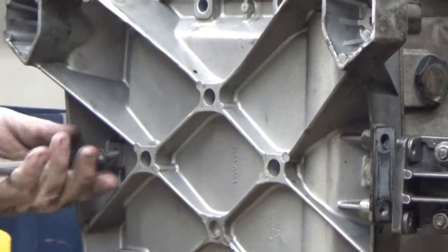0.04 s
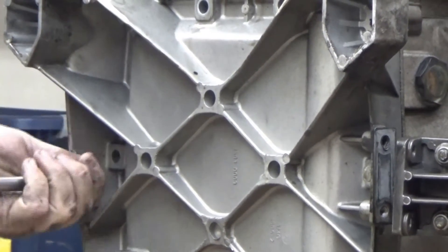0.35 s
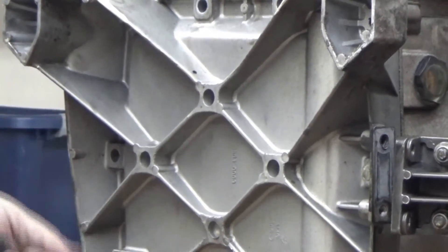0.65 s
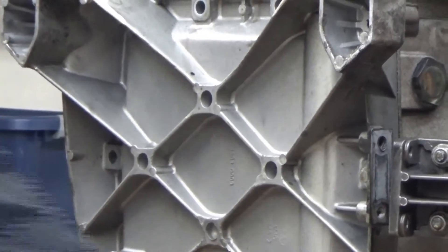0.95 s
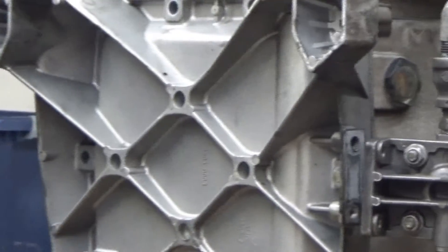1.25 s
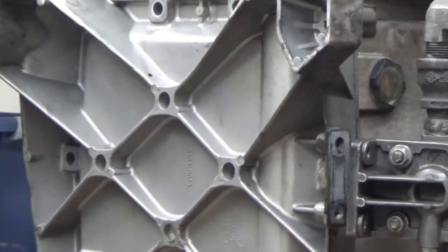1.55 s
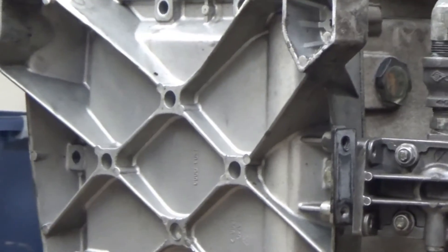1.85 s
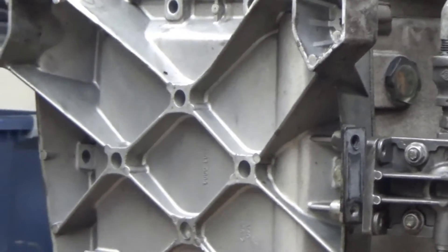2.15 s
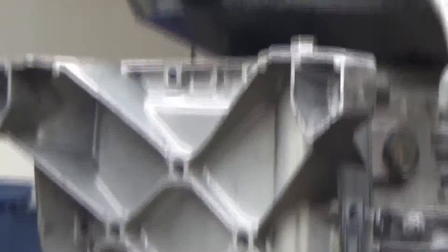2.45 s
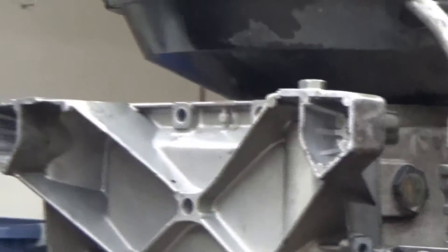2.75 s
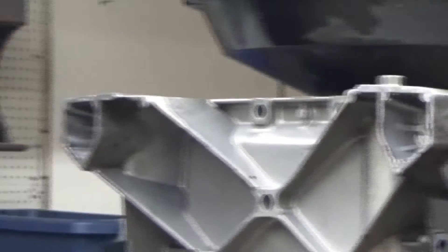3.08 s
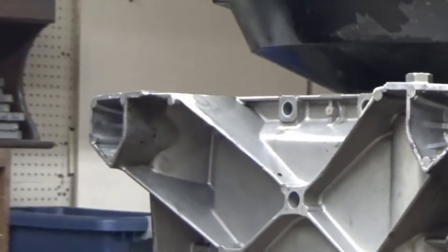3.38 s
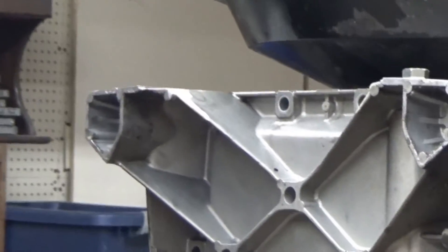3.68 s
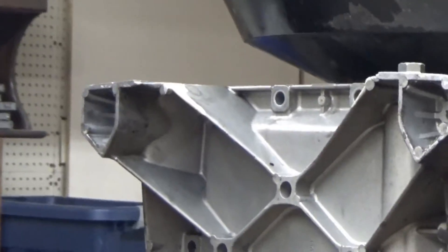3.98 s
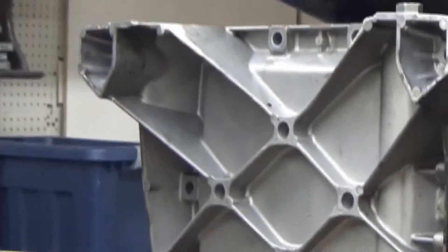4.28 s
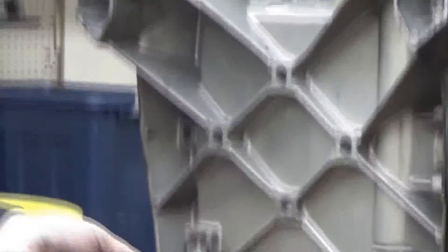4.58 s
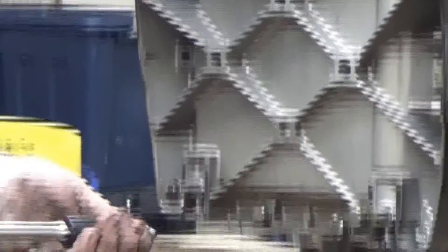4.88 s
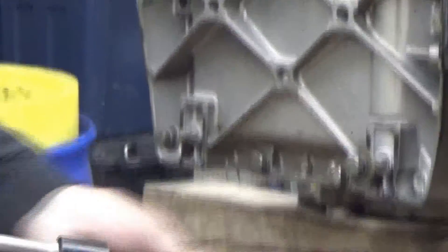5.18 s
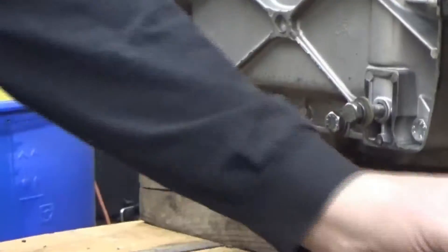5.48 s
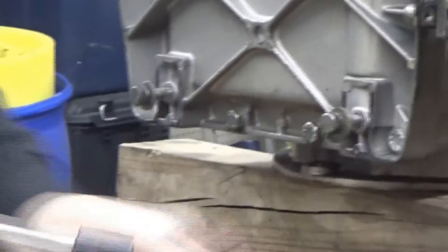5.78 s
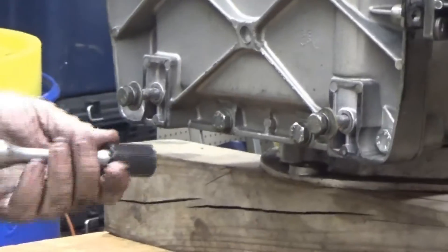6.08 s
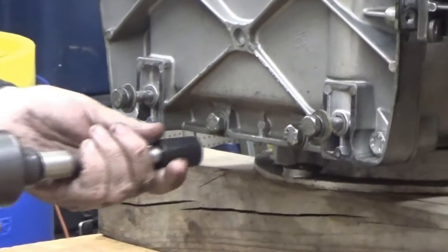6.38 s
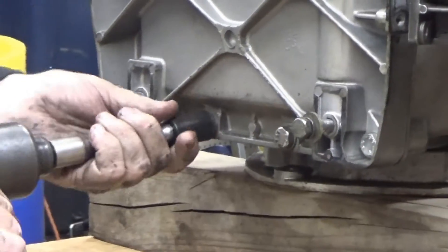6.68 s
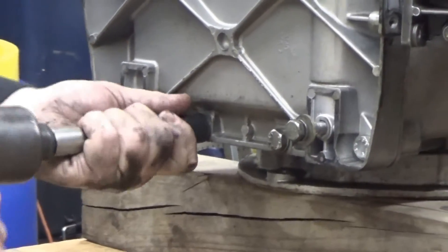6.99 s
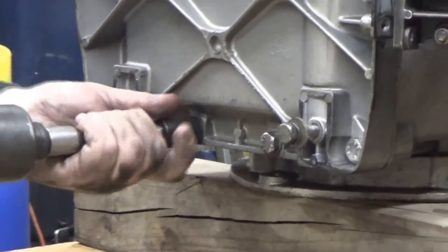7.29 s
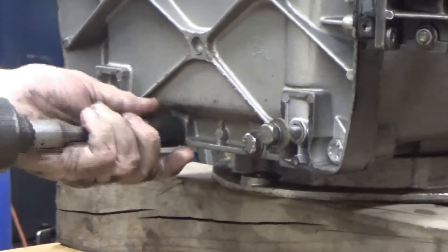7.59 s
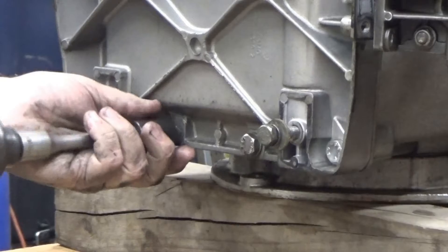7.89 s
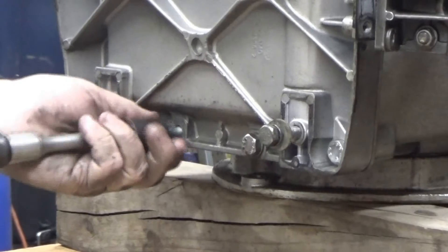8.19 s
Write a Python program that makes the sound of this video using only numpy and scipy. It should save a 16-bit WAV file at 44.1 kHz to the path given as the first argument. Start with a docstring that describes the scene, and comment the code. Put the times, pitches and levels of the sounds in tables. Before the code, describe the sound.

An air impact wrench winds down with a hiss and a clinking socket. A steel bolt drops onto a wooden bench and the tool clacks as it is handled. Two short bursts of hammering, whirring and hissing follow. Another bolt lands, the socket clanks onto a cast metal housing, and the wrench fires again. It all sounds close, in a slightly reverberant workshop with a faint hum.

```python
"""A hissing whir dies away and a loose steel socket clinks: an air impact wrench is running down.
In further short bursts it spins bolts out of a cast metal housing in a workshop. Its vane motor
chops the air into a whir and an exhaust hiss, while hammer impacts make the socket rattle.
Between bursts, bolts and tools ring and knock on a wooden bench, and the socket is pushed onto
the next bolt. The room reverberates over a faint machine hum."""
import sys
import numpy as np
from scipy import signal
from scipy.fft import rfft, irfft, next_fast_len
from scipy.io import wavfile
from scipy.ndimage import uniform_filter1d

SR = 44100
rng = np.random.default_rng(int(sys.argv[2]) if len(sys.argv) > 2 else 0)


def log_audio(samples):
    """Write samples as a 16-bit WAV file to the path given in sys.argv[1]."""
    # one column per channel
    frames = np.atleast_2d(samples).T
    # limit to full scale, then quantise
    limited = np.clip(frames, -1, 1)
    pcm = np.round(limited * 32767).astype(np.int16)
    wavfile.write(sys.argv[1], SR, pcm)


N = 363384
TIME = np.arange(N) / SR

# spectrum of steel striking steel: f/Hz, level/dB
STEEL_SPECTRUM = [(300, -23.5), (1450, -17), (1810, -1), (2300, -13), (3200, -14), (5200, -4.5),
                  (6500, -3.5), (8400, 1), (10000, -3), (12500, -7), (16000, -13.5)]
# modes of the steel socket: f/Hz, level/dB, t60/s
SOCKET_MODES = [(5420, -8.5, 0.024), (6490, -1, 0.0067), (7500, -4.5, 0.021), (7940, -1, 0.01),
                (8480, -2, 0.027), (8830, -4, 0.032), (9430, -4.5, 0.023), (10430, -5, 0.024)]
# trigger pulls: opening t/s, attack/s, exhaust level/dB, easing t/s, exhaust fade/s,
# motor level/dB, coasting t/s, motor fade/s, vane rate f/Hz above which the rotor runs smoothly
TRIGGER_PULLS = [(-.05, .01, -23.5, 0, .1, -26, 0, .2, 449.4),
                 (3.268, .011, -18.3, 3.769, .16, -24.5, 3.815, 0.16, 291),
                 (4.077, .03, -19.4, 4.39, .125, -24.5, 4.315, .08, 342),
                 (7.573, .012, -18.6, 7.941, .19, -24.3, 7.99, 0.26, 314.2),
                 (8.158, .035, -18.5, 8.24, .15, -26.5, 8.24, .2, 370)]


def amp(db):
    """Amplitude ratio of a level in decibels."""
    return 10 ** (np.asarray(db) / 20)


def unit_rms(x):
    """Normalisation to unit mean power."""
    return x / np.sqrt(np.mean(x ** 2) + 1e-20)


def value_at(points, hz):
    """Interpolation on a logarithmic frequency axis."""
    f, value = np.transpose(points)
    return np.interp(np.log(hz + 1), np.log(f + 1), value)


def coloured(x, spectrum):
    """Zero-phase filtering by a spectrum of f/Hz, level/dB."""
    size = next_fast_len(len(x))
    gain = amp(value_at(spectrum, np.fft.rfftfreq(size, 1 / SR)))
    return irfft(rfft(x, size) * gain, size)[:len(x)]


def noise(spectrum, size=N):
    """Spectrally shaped Gaussian noise of unit rms."""
    return unit_rms(coloured(rng.standard_normal(size), spectrum))


def drift(hz):
    """Random modulation: noise low-passed at hz, of unit rms."""
    coarse_time = np.linspace(0, TIME[-1], N // 32)
    lowpass = signal.butter(2, hz, fs=1 / coarse_time[1], output="sos")
    slow = signal.sosfilt(lowpass, rng.standard_normal(len(coarse_time)))
    return np.interp(TIME, coarse_time, unit_rms(slow))


def add(mix, start_s, sound):
    """Superposition of a delayed sound on the mix."""
    part = mix[max(round(start_s * SR), 0):][:len(sound)]
    part += sound[:len(part)]


def blow(spectrum, t60, rise_s=.00039):
    """Modal overlap: the crowded modes of a struck body merge into decaying noise."""
    t = TIME[:16384]
    return noise(spectrum, len(t)) * amp(-60 * t / t60) * (1 - np.exp(-t / rise_s))


def ring(modes, size=SR, rise_s=.00087):
    """Free vibration: each separate mode is a damped sinusoid."""
    t = TIME[:size]
    tones = sum(amp(db - 60 * t / t60) * np.sin(2 * np.pi * (hz * t + rng.random()))
                for hz, db, t60 in modes)
    return tones * (1 - np.exp(-t / rise_s))


def shop_noise(level_db=-66):
    """Stationary broadband noise forms the floor of the workshop."""
    # ambient spectrum: f/Hz, level/dB
    spectrum = [(12, -41.5), (20, -15), (66, -3.5), (103, -11), (497, -15), (587, -12.5), (656, -17),
                (1140, -17), (1350, -18.5), (2450, -19), (2800, -23.5), (3500, -21), (3970, -19.5),
                (4310, -22), (15000, -24.5)]
    return amp(level_db) * noise(spectrum)


def machine_hum():
    """A line spectrum: machines in the shop give steady pure tones."""
    # machine tones: f/Hz, rms level/dB
    tones = [(597.5, -82), (15735, -70)]
    return sum(amp(db) * np.sqrt(2) * np.sin(2 * np.pi * hz * TIME) for hz, db in tones)


def faint_whistle(edge_s=.2, width_hz=60):
    """Narrow-band noise is heard as a thin, wavering tone that comes and goes."""
    # the whistle: start t/s, end t/s, f/Hz, level/dB
    whistle = (1.05, 2.4, 3327, -78)
    start, end, hz, db = whistle
    swell = np.clip(np.minimum(TIME - start, end - TIME) / edge_s, 0, 1)
    phase = 2 * np.pi * hz * TIME
    return amp(db) * swell * (drift(width_hz) * np.cos(phase) + drift(width_hz) * np.sin(phase))


def wide_treble_hiss(burst_gain, level_db=-13):
    """Amplitude modulation: thin stereo noise above 8 kHz swells with each burst."""
    spectrum = [(7000, -50), (8500, -7), (10000, -2), (14000, 0), (16000, -12)]  # f/Hz, level/dB
    return amp(level_db) * burst_gain * noise(spectrum)


def room_response(gap_s=.0037, density=.1):
    """Reverberation: dense reflections decay exponentially, each band at its own rate."""
    # reverberation time of the workshop: f/Hz, t60/s
    decay_times = [(100, 0.86), (400, 0.78), (1200, 0.72), (3000, 0.84), (8000, 0.54), (15000, 0.23)]
    taps = rng.choice([-1., 1.], SR) * (rng.random(SR) < density) * (TIME[:SR] > gap_s)
    hz, t, bands = signal.stft(taps, SR, nperseg=256)
    decay = amp(-60 * t / value_at(decay_times, hz)[:, None])
    echoes = signal.istft(bands * decay, SR, nperseg=256)[1]
    return echoes / np.linalg.norm(echoes)


def room(x, moves_per_s=2.6):
    """Time-varying convolution: the reflections shift as the arm and the tool move."""
    angle = 2 * np.pi * moves_per_s * TIME
    shares = np.cos(angle), np.sin(angle)
    return sum(signal.oaconvolve(x * share, room_response())[:N] for share in shares)


def sleeve():
    """Friction noise: cloth brushes past in short, thin rustles."""
    # brushes of the sleeve: t/s, duration/s, level/dB
    brushes = [(2.773, 0.087, -49), (4.676, 0.16, -54.5), (6.997, 0.14, -62.5)]
    cloth = [(500, -4), (5000, -6), (9500, 4), (15000, -14.5)]  # f/Hz, level/dB
    out = np.zeros(N)
    for start, duration, db in brushes:
        swell = np.hanning(round(duration * SR))
        add(out, start, amp(db) * swell * noise(cloth, len(swell)))
    return out


def handling(knock_t60=.11, clack_t60=.031, thud_t60=.27, seat_t60=.061):
    """Impact excitation: bench and tool are quickly damped, while the cast housing rings on."""
    # knocks on the wooden bench: t/s, level/dB
    knocks = [(1.279, -28), (1.317, -29), (1.362, -34), (1.724, -43), (2.08, -58.5), (5.76, -30),
              (5.768, -20.5), (5.789, -29), (5.845, -34.5), (6.8989, -58)]
    # the wrench is handled or kicks: t/s, clack level/dB, thud level/dB
    clacks = [(2.2991, -41, -52.5), (2.3268, -24.5, -61), (2.348, -35, -42.5), (2.979, -37, -52),
              (2.983, -33, -54), (4.709, -38, -42.5), (6.793, -55, -57), (6.8981, -49, -57.5),
              (7.575, -21, -37), (7.636, -17.5, -41), (7.683, -17, -33)]
    # the socket is pushed home on a bolt: t/s, blow level/dB, ring level/dB
    seatings = [(7.3074, -23, -38), (7.313, -16.5, -32)]
    # impact spectra: f/Hz, level/dB
    bench = [(80, -55), (170, -45), (245, -3.5), (370, -4.5), (750, 4.5), (1300, -0.5), (2100, -6.5),
             (2900, -24.5), (6000, -23), (15000, -28)]
    tool = [(200, -18), (800, -3), (1500, 0.5), (2100, 3), (3000, -6.5), (5500, -2), (8000, -2.5),
            (12000, -13.5), (16000, -28.5)]
    casting = [(25, -54), (55, -27), (90, -9), (300, 2), (900, -6), (1300, 2), (2200, -7), (2900, -16.5),
               (5500, -22), (10000, -24), (16000, -44)]
    thud = [(25, -38.5), (90, -4), (300, 5), (500, -2.5), (1200, -8), (4000, -40.5)]
    # modes of the struck housing: f/Hz, level/dB, t60/s
    housing_modes = [(318, -14, .6), (472, -7, .33), (890, -5, 0.47), (1250, -3, .2), (1743, -1.5, .2),
                     (2207, 1, 0.16), (2394, -5.5, .2), (2930, -8.5, 0.2), (3385, -6.5, 0.17),
                     (4070, -13, 0.27), (5071, -16, 0.37), (5346, -10.5, .17), (6980, -22, .6),
                     (7540, -17, .25), (8161, -16, .2), (8745, -19, .24), (9938, -11, 0.14),
                     (12400, -21, .18)]
    out = np.zeros(N)
    for start, db in knocks:
        add(out, start, amp(db) * blow(bench, knock_t60))
    for start, clack_db, thud_db in clacks:
        add(out, start, amp(clack_db) * blow(tool, clack_t60) + amp(thud_db) * blow(thud, thud_t60))
    for start, blow_db, ring_db in seatings:
        add(out, start, amp(blow_db) * blow(casting, seat_t60, rise_s=.00096))
        add(out, start, amp(ring_db) * ring(housing_modes))
    return out


def bolts(tick_t60=.0072, ring_t60=.28):
    """Vibration of bars: loose bolts tick and ring as they are put down and bounce."""
    # landings: t/s, tick level/dB, high ring level/dB, bending level/dB
    landings = [(.415, -38, -44, -84), (1.123, -48.5, -42, -90), (1.278, -15, -21, -80),
                (1.317, -27, -28, -80), (1.363, -26.5, -33, -74), (1.8, -70, -85, -58.5),
                (5.685, -39.5, -32.5, -74), (5.768, -19, -17, -48), (5.789, -20, -26, -38),
                (5.843, -19, -23, -35.5)]
    # spectrum of the first touch: f/Hz, level/dB
    tick = [(300, -23), (1800, -9), (3200, -19), (5200, -8), (7000, -3.5), (9000, 1), (12500, -3),
            (16000, -9)]
    # short, high ring: f/Hz, level/dB
    high_modes = [(13385, -3.5), (13450, -10)]
    # long bending modes: f/Hz, level/dB, t60/s
    bending_modes = [(4410, -15, .9), (5950, -4, 0.62), (5935, -11, 0.5), (8720, -5.5, 0.42),
                     (10100, -5, 0.28), (10560, -9, .5)]
    out = np.zeros(N)
    for start, tick_db, ring_db, bend_db in landings:
        add(out, start, amp(ring_db) * ring([(hz, db, ring_t60) for hz, db in high_modes]))
        add(out, start, amp(tick_db) * blow(tick, tick_t60, rise_s=.00005))
        add(out, start, amp(bend_db) * ring(bending_modes, rise_s=.0077))
    return out


def casting_ring(level_db=-30.5):
    """Free decay: the shaken casting sings on faintly from the moment the trigger eases."""
    # lightly damped modes of the casting: f/Hz, level/dB, t60/s
    modes = [(597.5, 2, 1.4), (880, -19.5, 2.3), (1358, -5.5, 2.5), (1600, -11, 0.74), (2136, -10, 1.8)]
    out = np.zeros(N)
    for _, _, air_db, eases, *_ in TRIGGER_PULLS:
        add(out, eases, amp(level_db + air_db) * ring(modes, size=2 * SR))
    return out


def socket_contact(crack_t60=.016, crack_db=-2, modes_db=-4, spread_db=4):
    """Steel strikes steel: each impact shares its energy differently among the socket's modes."""
    bias_db = spread_db * rng.standard_normal(len(SOCKET_MODES))
    bias_db -= 10 * np.log10(np.mean(amp(bias_db) ** 2))
    modes = [(hz, db + bias, t60) for (hz, db, t60), bias in zip(SOCKET_MODES, bias_db)]
    crack = blow(STEEL_SPECTRUM, crack_t60)
    return amp(crack_db) * crack + amp(modes_db) * ring(modes, size=len(crack))


def whirl_envelope():
    """The socket's whirl grows as the bolt comes out and decays exponentially with the run-down."""
    # spins on a loose bolt: peak t/s, level/dB, swell/s, decay rate/(dB/s)
    spins = [(0, -17, .05, 120), (4.44, -20, .11, 150), (8.0, -22, 0.053, 220)]
    return sum(amp(db - fade * np.maximum(TIME - peak, 0)) * np.clip(1 + (TIME - peak) / swell_s, 0, 1)
               for peak, db, swell_s, fade in spins)


def socket_whirl(level_db=-3, scrape_db=3):
    """Friction drives the resonances of the hollow socket as it scrapes unevenly round."""
    # spectrum of the whirling socket: f/Hz, level/dB
    spectrum = [(40, -55.5), (150, -14), (300, -23), (560, -17), (700, -3), (780, -1), (880, -1.5),
                (990, -1.5), (1120, -2), (1300, -11), (1800, -11), (3000, -20.5), (8000, -40.5)]
    scrape = unit_rms(noise(spectrum) * amp(scrape_db * drift(hz=72)))
    return amp(level_db) * whirl_envelope() * scrape


def socket_rattle(per_s=55, light_db=-3.5, spread_db=3.5):
    """A Poisson train of light impacts on the bolt head runs under the socket's sharp clinks."""
    # sharp clinks: t/s, level/dB
    clinks = [(0.038, -12), (.052, -16.5), (0.1004, -19), (0.1451, -14.5), (0.2077, -12.5), (0.2302, -21),
              (0.261, -27.5), (0.3111, -18.5), (0.324, -26), (2.787, -42), (3.96, -25.5), (4.1, -13),
              (4.111, -13), (4.144, -12), (4.39, -15), (4.5344, -22), (4.5958, -22.5), (4.7797, -35),
              (5.088, -44), (7.858, -8.5)]
    touches = rng.random(N) < per_s / SR
    strength = amp(light_db + spread_db * np.clip(rng.standard_normal(N), -2, 2))
    out = signal.oaconvolve(touches * strength * whirl_envelope(), socket_contact())[:N]
    for start, db in clinks:
        add(out, start, amp(db) * socket_contact())
    return out


def valve_leak():
    """Orifice noise: air whistles through the barely open trigger valve."""
    # leaks before the valve opens fully: start t/s, end t/s, level/dB
    leaks = [(3.228, 3.246, -36.5), (3.242, 3.274, -30), (7.514, 7.588, -34)]
    # spectrum of the leak: f/Hz, level/dB
    spectrum = [(150, -31), (400, -9), (1200, -6), (2200, 1.5), (3000, -15.5), (4600, -15), (6200, 3.5),
                (7600, -17.5), (9200, -1), (10500, -17), (16000, -22)]
    opening = sum(amp(db) * ((TIME > start) & (TIME < end)) for start, end, db in leaks)
    return uniform_filter1d(opening, size=128) * noise(spectrum)


def trigger(opens, attack_s, eases, fade_s, closing_power=1.6):
    """Throttling: the valve opens, holds, then closes ever faster, 20 dB down after fade_s."""
    opening = np.clip((TIME - opens) / attack_s, 0, 1)
    closing = np.maximum(TIME - eases, 0) / fade_s
    return opening * amp(-20 * np.minimum(closing ** closing_power, 10))


def running_state(surge_db=3, surge_s=.067, swell_db=5, swell_s=.04, release_hz=14,
                  waver_db=1.2, db_per_octave=3, free_run_db=3.5):
    """Air supply and load: vane rate, freedom of the rotor (0-1), and gains of exhaust and motor."""
    # motor speed, one curve a pull: t/s, vane rate f/Hz
    speed_curves = [
        [(0, 326.9), (.2, 130.9)],
        [(3.27, 69.98), (3.38, 180.2), (3.5, 134.9), (3.6, 205.3), (3.73, 298), (3.82, 301.1), (3.97, 289.7)],
        [(4.08, 119.8), (4.13, 284.2), (4.2, 460.3), (4.235, 531.4), (4.272, 541.8), (4.33, 404.5),
         (4.44, 221.3), (4.62, 100.3)],
        [(7.57, 69.88), (7.67, 175.2), (7.75, 139.8), (7.82, 255.6), (7.89, 211.2), (7.96, 300), (8.1, 306.2)],
        [(8.17, 291.2), (8.24, 349.8)],
    ]
    vane_hz = np.interp(TIME, *np.concatenate(speed_curves).T)
    smooth_above, air, drive = np.zeros((3, N))
    for opens, attack_s, air_db, eases, fade_s, motor_db, coasts, coast_s, smooth_hz in TRIGGER_PULLS:
        smooth_above[TIME >= opens] = smooth_hz
        surge = np.exp(-np.maximum(TIME - opens, 0) / surge_s)  # the hose gives up its stored pressure
        swell = np.exp(-((TIME - coasts) / swell_s) ** 2)  # the whine swells as coasting begins
        air += amp(air_db + surge_db * surge) * trigger(opens, attack_s, eases, fade_s)
        drive += amp(motor_db + swell_db * swell) * trigger(opens, attack_s, coasts, coast_s)
    free = .5 + .5 * np.tanh((vane_hz - smooth_above) / (2 * release_hz))  # the bolt lets go
    air *= amp(waver_db * drift(hz=16))  # the hammer loads and releases the rotor
    drive *= amp(db_per_octave * np.log2(vane_hz / 300) + free_run_db * free)
    return vane_hz, free, air, drive


def exhaust(vane_cycles, chop=.29):
    """Amplitude modulation: the passing vanes chop the turbulent exhaust."""
    # spectrum of the hiss: f/Hz, level/dB
    spectrum = [(880, -33.5), (1500, -15), (1960, -1.5), (2160, -5), (2320, -7), (2990, -12), (4630, -8),
                (5360, -3.5), (7000, -4.5), (7580, -2.5), (8700, -0.5), (10400, -3), (12900, -17),
                (14100, -4), (15900, -28.5)]
    return unit_rms(noise(spectrum) * (1 + chop * np.cos(2 * np.pi * vane_cycles)))


def vane_motor(vane_hz, rough, wobble=.028, puff_cycles=.26, flutter_db=2.5, free_hz=420):
    """The siren principle: each vane releases a puff of air; under load the puffs turn ragged."""
    # partials, the fractions from the slower turn of the hammer: f/vane rate
    orders = [1, 1.75, 2, 2.5, 2.75, 3, 4, 4.5, 5, 6, 7, 8, 9, 10, 12]
    # strength of each partial: level/dB
    order_levels = [-1, -4.5, 0, -5.5, -10.5, 0.5, 0.5, -10, -5, -1.5, -15.5, -10.5, -10, -9.5, -8.5]
    # spectral envelopes of the whir and of the muffled puffs: f/Hz, level/dB
    whir_spectrum = [(70, -25), (150, -4), (300, -2.5), (525, -2.5), (620, 1.5), (900, -1.5), (1150, -4.5),
                     (1600, -1.5), (2200, -5), (2700, -11), (5000, -23.5)]
    muffler = [(60, -32.5), (110, -18), (165, -5.5), (210, -9), (280, 3), (550, -3), (900, -1),
               (1300, -4.5), (2100, -10.5), (2800, -17.5), (5000, -16.5), (9000, -53.5)]
    loaded = np.clip((free_hz - vane_hz) / 100, 0, 1)  # the hammer stops slipping as the bolt spins free
    hz = vane_hz * (1 + wobble * np.sqrt(rough) * loaded * drift(hz=59.28))  # the rotor stutters
    cycles = np.cumsum(hz) / SR
    whir, power = np.zeros((2, N))
    for order, db in zip(orders, order_levels):
        gain = amp(db + value_at(whir_spectrum, order * hz)) * (loaded if order % 1 else 1)
        flutter = amp(flutter_db * loaded * drift(hz=25))
        whir += gain * flutter * np.cos(2 * np.pi * (order * cycles + rng.random()))
        power += gain ** 2 / 2
    puffs = np.exp(-(cycles % 1) / puff_cycles) * rng.standard_normal(N)
    muffled = unit_rms(coloured(puffs, muffler))
    return np.sqrt(1 - rough) * whir / np.sqrt(power) + np.sqrt(rough) * muffled, cycles


def hammer(per_s=51, unevenness=.3, spread_db=2, t60=.047, chatter_per_s=160, chatter_db=-3):
    """An uneven impulse train: the hammer slaps the anvil and the socket chatters on the bolt head."""
    count = np.floor(np.cumsum(per_s * np.exp(unevenness * drift(hz=24.74))) / SR)
    strikes = (np.diff(count, prepend=0) > 0) * amp(spread_db * np.clip(rng.standard_normal(N), -2, 2))
    envelope = signal.lfilter([1], [1, -amp(-60 / (t60 * SR))], strikes)
    contacts = strikes + (rng.random(N) < chatter_per_s / SR)
    chatter = sum(signal.oaconvolve(contacts * rng.uniform(-.58, 1, N), ring([mode], size=4096))[:N]
                  for mode in SOCKET_MODES)
    slaps = unit_rms(envelope * noise(STEEL_SPECTRUM))
    return unit_rms(slaps + amp(chatter_db) * unit_rms(chatter))


def wrench(vane_hz, free, air, drive, hiss_db=-2, motor_db=-3, hammer_db=-1,
           rough_loaded=.74, hammer_loaded=.5, hammer_free=.3):
    """Incoherent sources add in power: load shifts it from whir to puffs and from hiss to hammering."""
    hammer_share = hammer_loaded * (1 - free) + hammer_free * free
    whir, vane_cycles = vane_motor(vane_hz, rough=rough_loaded * (1 - free))
    hiss = amp(hiss_db) * np.sqrt(1 - hammer_share) * exhaust(vane_cycles)
    hammering = amp(hammer_db) * np.sqrt(hammer_share) * hammer()
    return air * (hiss + hammering) + amp(motor_db) * drive * whir + socket_whirl() + casting_ring()


def scene(side_db=2, bounce_db=-16, bounce_s=.0025):
    """Mid-side stereo: direct sound is central; reflections and shop noise give width, and thin noise above 8
    kHz spreads wide with each burst."""
    # width of the reverberation and of the shop noise: f/Hz, side-over-mid level/dB
    room_width = [(30, -8.5), (90, -12.5), (300, -7.5), (900, -6.5), (2500, -11), (7200, -10), (8500, -22),
                  (15000, -18)]
    shop_width = [(30, -5), (100, -13), (300, -3), (900, 2), (3000, -2), (7000, -8.5), (9000, -20)]
    vane_hz, free, air, drive = running_state()
    # signal, level/dB sent to the room
    sources = [(wrench(vane_hz, free, air, drive) + valve_leak(), -5),
               (socket_rattle() + sleeve(), -7), (bolts(), -10), (handling(), -1)]
    direct = sum(x for x, _ in sources)
    sent = sum(amp(send_db) * x for x, send_db in sources)
    mid = direct + room(sent) + machine_hum() + faint_whistle() + shop_noise()
    side = amp(side_db) * coloured(room(sent), room_width) + coloured(shop_noise(), shop_width)
    side += wide_treble_hiss(burst_gain=air)
    add(side, bounce_s, amp(bounce_db) * direct)  # early reflection off the casting
    return np.array([mid + side, mid - side])


def record(dry, ceiling=.89, low_cut_hz=35, high_cut_hz=15950):
    """Band limiting and soft saturation: deep bass and top treble are cut, high peaks rounded."""
    highpass = signal.butter(2, low_cut_hz, "high", fs=SR, output="sos")
    lowpass = signal.firwin(511, high_cut_hz, window=("kaiser", 9), fs=SR)
    rounded = ceiling * np.tanh(signal.sosfilt(highpass, dry) / ceiling)
    return signal.oaconvolve(rounded, lowpass[None], "same")


dry = scene()
out = record(dry)
log_audio(out)
```